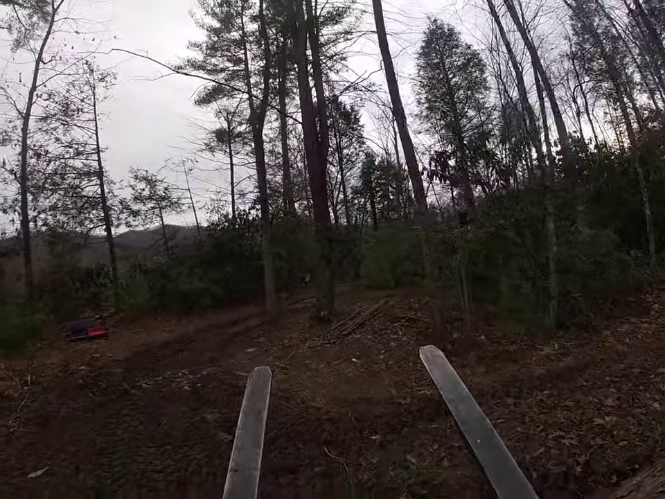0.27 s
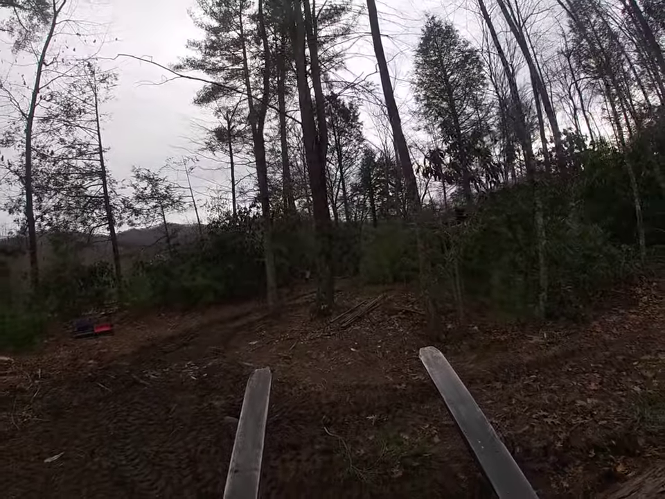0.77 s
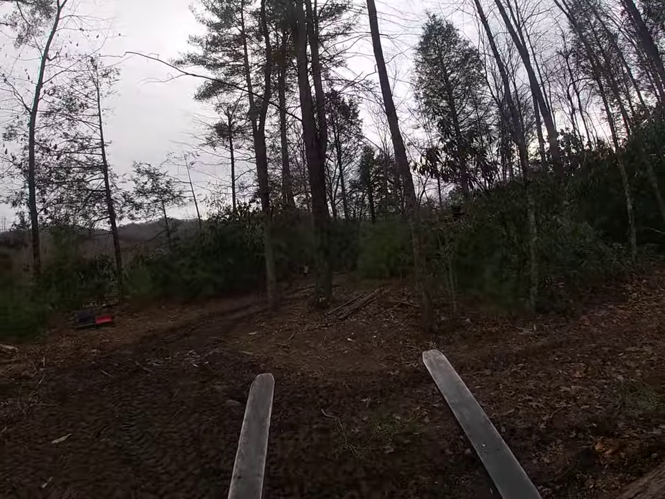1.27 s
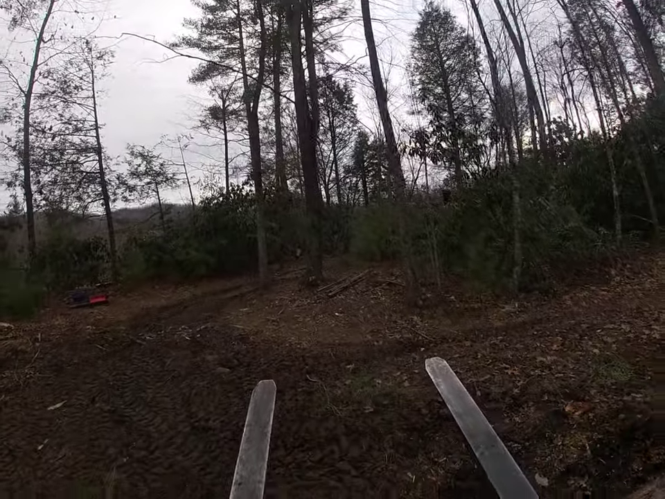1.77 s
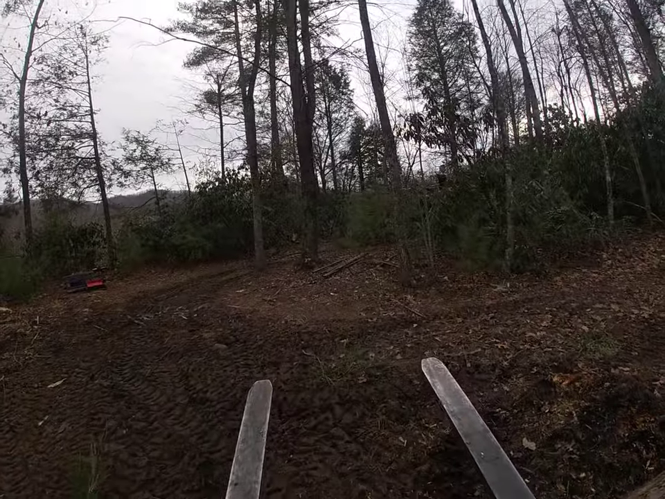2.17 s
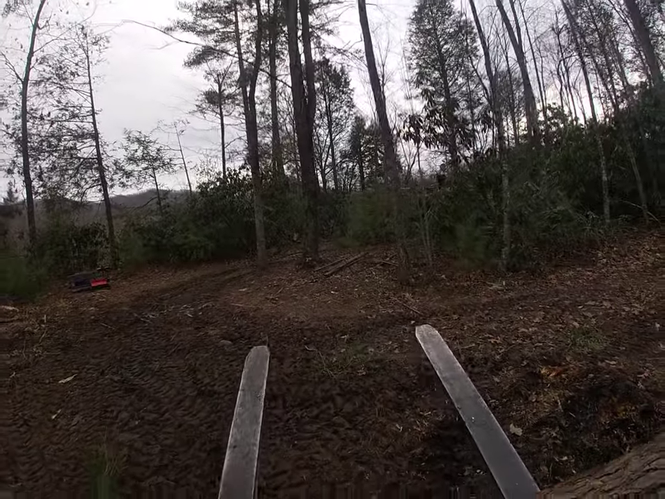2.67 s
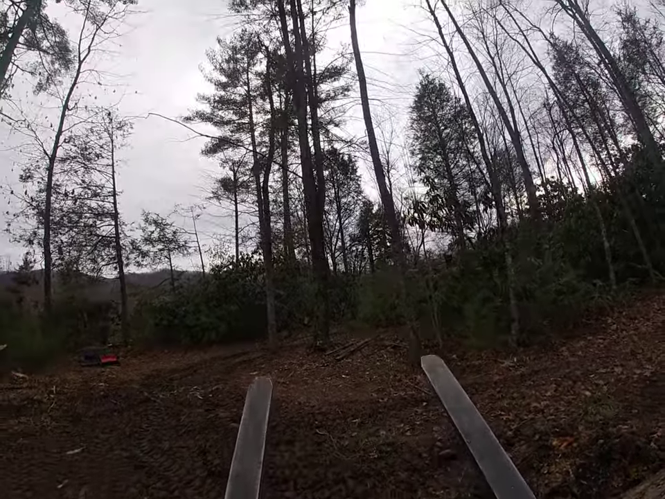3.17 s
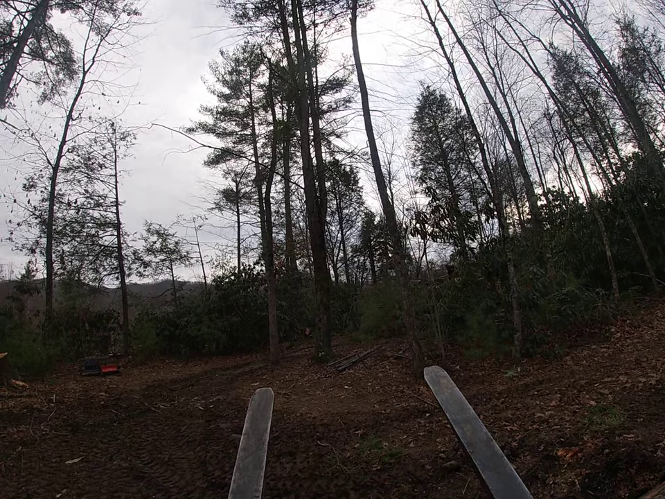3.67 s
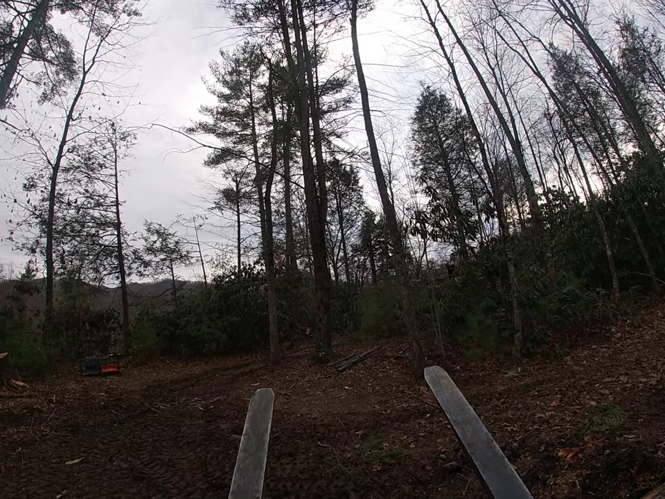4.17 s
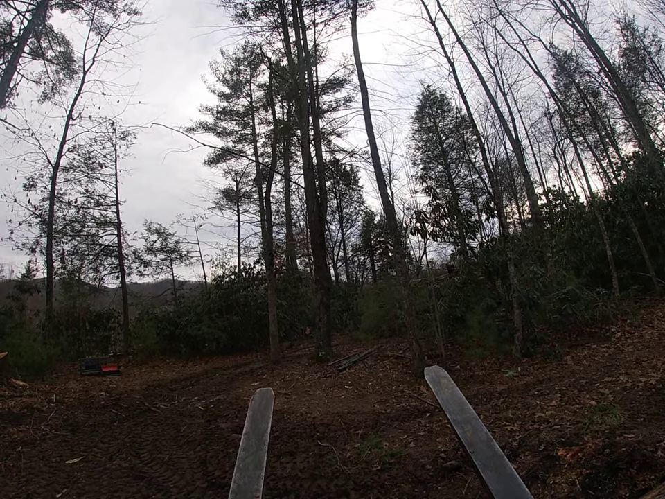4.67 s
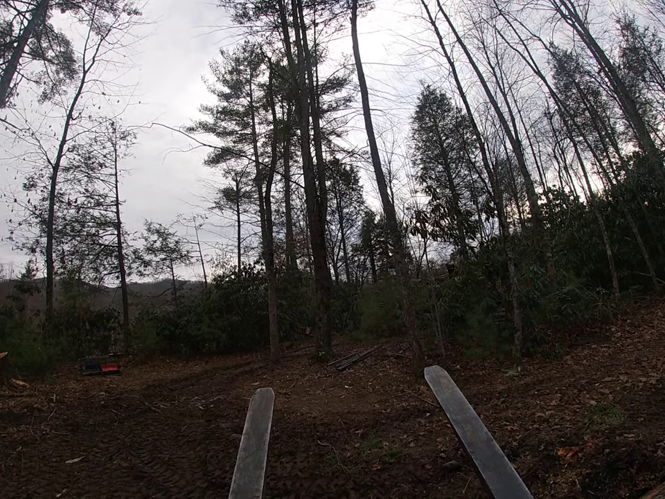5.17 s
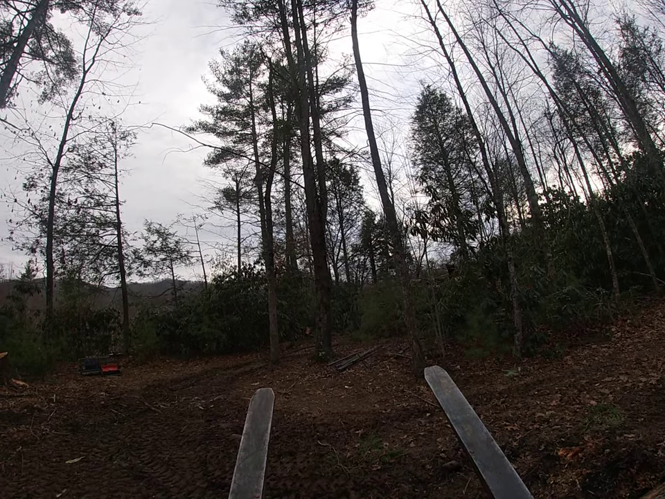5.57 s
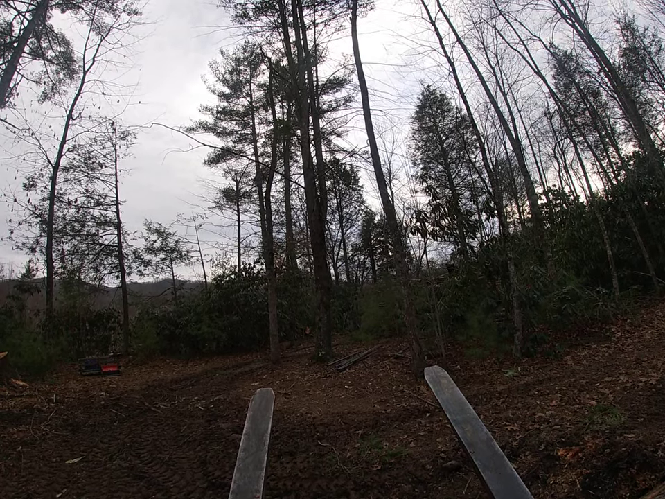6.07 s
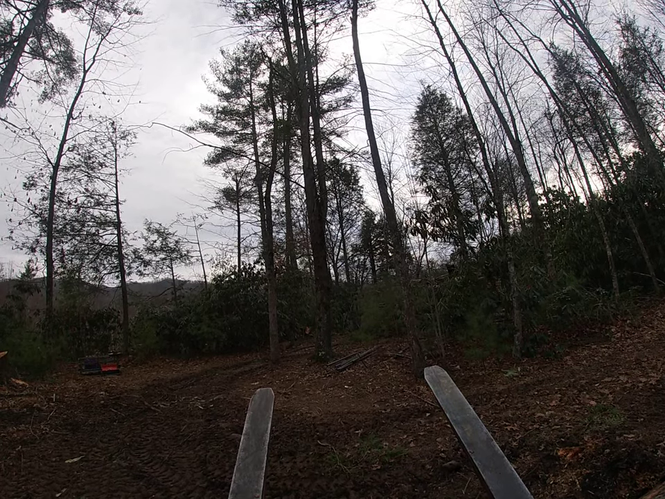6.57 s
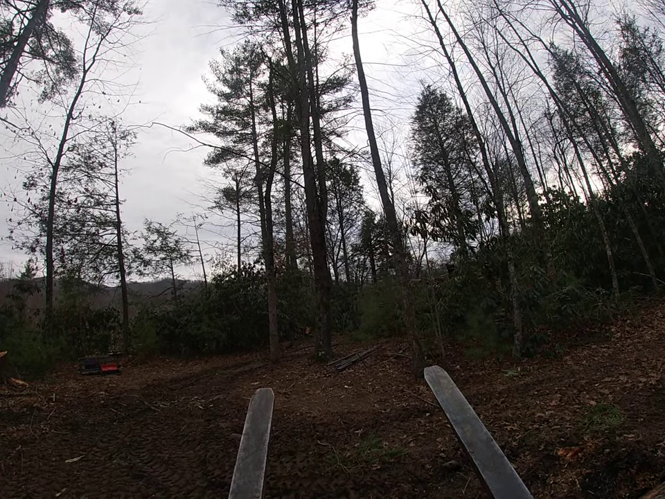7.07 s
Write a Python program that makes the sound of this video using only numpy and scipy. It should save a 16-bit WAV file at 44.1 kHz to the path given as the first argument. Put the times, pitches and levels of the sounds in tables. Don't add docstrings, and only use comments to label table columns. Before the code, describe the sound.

A small three-cylinder diesel tractor heard close from the operator's side in open woodland. It drones at steady working speed with dense valve clatter, gear whine and changing hydraulic whine. Around three seconds a loader clunks hard and a loose pin jingles. The engine holds on, then near five and a half seconds the throttle closes and the pitch slides quickly down to a rough, ticking idle with a loose plate rattling.

```python
import sys
import numpy as np
from scipy import signal
from scipy.fft import rfft, irfft, next_fast_len
from scipy.io import wavfile

SR = 44100
rng = np.random.default_rng(int(sys.argv[2]) if len(sys.argv) > 2 else 0)


def amplitude_ratio(level_db):
    exponent = np.asarray(level_db, float) / 20
    return 10 ** exponent


def waveform_to_disk(signal):
    frames = np.transpose(np.atleast_2d(signal))
    scaled = np.clip(frames, -1, 1) * 32767
    samples = np.round(scaled).astype(np.int16)
    wavfile.write(sys.argv[1], SR, samples)


N = 323253
TIME_S = np.arange(N) / SR


def rms_one(x):
    return x / np.sqrt(np.mean(x ** 2) + 1e-20)


def in_time(rows):
    s, value = np.transpose(rows)
    return np.interp(TIME_S, s, value)


def drift(rate_hz):
    r = np.exp(-80 * np.pi * rate_hz / SR)
    slow = signal.lfilter([1], [1, -2 * r, r * r], rng.standard_normal(N // 40 + 2002))[2000:]
    return np.interp(np.arange(N) / 40, np.arange(len(slow)), rms_one(slow))


def resonator(hz, width_hz):
    r = np.exp(-np.pi * width_hz / SR)
    return [1, -2 * r * np.cos(2 * np.pi * hz / SR), r * r], r


def resonances(x, modes):
    out = 0
    for k, (hz, width_hz, db) in enumerate(modes):
        poles, r = resonator(hz, width_hz)
        ring = signal.lfilter([1, 0, -1], poles, x)
        out = out + (-1) ** k * amplitude_ratio(db) * (1 - r * r) / 2 * ring
    return out


def coloured(x, spectrum):
    hz, db = np.transpose(spectrum)
    size = next_fast_len(N)
    log_hz = np.log(np.fft.rfftfreq(size, 1 / SR) + 1)
    gain = amplitude_ratio(np.interp(log_hz, np.log(hz), db))
    return rms_one(irfft(rfft(x, size) * gain, size)[:N])


def band(x, low_hz, high_hz):
    return signal.sosfilt(signal.butter(2, [low_hz, high_hz], "band", fs=SR, output="sos"), x)


def low_pass(x, hz):
    return signal.sosfilt(signal.butter(4, hz, fs=SR, output="sos"), x)


def bursts(events, t60s, rise_s):
    out = np.zeros(N)
    for (s, db, *_), t60 in zip(events, t60s):
        span = slice(int(s * SR), min(N, int((s + 2 * t60) * SR)))
        age = np.arange(span.stop - span.start) / SR
        out[span] += amplitude_ratio(db - 60 * age / t60) * (1 - np.exp(-age / rise_s))
    return out * rng.standard_normal(N) + 1e-18


def at_crank(firings, sizes, per_firing):
    step = np.floor(firings * per_firing).astype(int)
    click = np.append(0, np.diff(step) > 0)
    return click * np.asarray(sizes)[step % len(sizes)] / np.sqrt(np.gradient(firings))


def tones(firings, orders, levels_db, flutter_db, spread=0):
    out = np.zeros(N)
    for k, db in zip(orders, levels_db):
        phase = 2 * np.pi * k * firings - spread * k * (k - 1)
        out += np.sqrt(2) * amplitude_ratio(db + flutter_db * drift(18)) * np.sin(phase)
    return out


SHUT_S, COASTING_S, COASTED_S, CATCH_S, SETTLED_S = 5.54, 5.64, 5.97, 6.08, 6.4


def by_state(work_db, shut_db, recovery_db):
    working = np.interp(TIME_S, [SHUT_S, COASTING_S], [1, 0])
    off_db = np.interp(TIME_S, [COASTING_S, COASTED_S, CATCH_S, SETTLED_S], shut_db)
    recovered = np.interp(TIME_S, [CATCH_S, SETTLED_S], [0, 1])
    return working * work_db + (1 - working) * off_db + recovered * recovery_db


def valve_ticks(seatings, per_s, slowed):
    decay_s, tick_db, between_db = .014, 3, -5
    strength = amplitude_ratio(tick_db + 1.8 * rng.standard_normal(400))[seatings.astype(int)]
    tick = strength * np.exp(-(seatings % 1) / per_s / decay_s)
    return 1 - slowed + slowed * (amplitude_ratio(between_db) + tick)


def contacts(firings, throb, repeat, sharp, lag):
    per_firing = 200
    looped = rms_one(at_crank(firings, rng.standard_normal(3 * per_firing), per_firing))
    shake = np.sqrt(repeat) * looped + np.sqrt(1 - repeat) * rng.standard_normal(N)
    swell = np.exp(sharp * np.cos(2 * np.pi * (firings - lag)))
    throb = np.clip(throb, 0, 1)
    return shake * (1 - throb + throb * rms_one(swell))


def oil_hiss(travel_db):
    hiss = band(band(rng.standard_normal(N), 12000, 14200), 12000, 14200)
    return amplitude_ratio(-81 + .5 * travel_db) * rms_one(hiss)


# start in seconds, peak in dB.
TWIG_TICKS = [
    (0.7986, -53),
    (1.3594, -46.5),
    (2.1833, -51),
    (4.4425, -48),
]


def twigs():
    return low_pass(band(bursts(TWIG_TICKS, [.12] * 4, rise_s=0.0043), 6000, 11000), 13000)


# start in seconds, peak in dB, upper mode in dB, pitch factor, t60 in seconds.
PIN_TOUCHES = [
    (2.888, -36, -30, 1.0, .05),
    (3.111, -25, -25, .975, .05),
    (3.120, -23, -20, 1.004, .07),
    (3.146, -21, -23, 1.0, .04),
    (3.162, -34, -14, 1.012, .05),
    (3.191, -35, -22, .996, .05),
]
PIN_MODES_HZ = (5150, 8880)


def pin():
    out = np.zeros(N)
    for s, db, upper_db, pitch, t60 in PIN_TOUCHES:
        span = slice(int(s * SR), int((s + .12) * SR))
        age = TIME_S[span] - TIME_S[span][0]
        lower, upper = [np.sin(2 * np.pi * hz * pitch * age) for hz in PIN_MODES_HZ]
        out[span] += amplitude_ratio(db - 60 * age / t60) * (lower + amplitude_ratio(upper_db) * upper) * (1 - np.exp(-age / .0008))
    return out


# start in seconds, peak in dB, t60 in seconds.
LOADER_BANGS = [
    (3.0127, -21.5, 0.058),
    (3.032, -16, 0.058),
    (3.0417, -18.5, 0.17),
]


def loader():
    bang = bursts(LOADER_BANGS, np.array(LOADER_BANGS)[:, 2], rise_s=0.00073)
    thud = amplitude_ratio(22) * band(bang, 170, 320)
    clank = amplitude_ratio(7) * band(bang, 880, 2080) + amplitude_ratio(-3) * band(bang, 1700, 4300)
    edge = amplitude_ratio(-31) * low_pass(band(bang, 9000, 9500), 10000)
    return low_pass(thud + clank, 7200) + edge


# Hz, width in Hz, level in dB.
SHROUD_MODES = [(394, 46, 0)]


def fan_shroud(travel_db):
    return amplitude_ratio(-34 + .83 * travel_db) * rms_one(resonances(rng.standard_normal(N), SHROUD_MODES))


# start in seconds, end in seconds, pump second in dB, pump third in dB.
VALVE_WHINES = [
    (0, .3, -35, -42),
    (1.68, 2.07, -41.5, -49),
    (2.45, 2.73, -29.5, -31),
    (2.74, 3.11, -40, -36),
    (3.7, 5.55, -36, -60),
]


def whine(rest_db, column):
    edge_s = 0.027
    level_db = rest_db + np.zeros(N)
    for row in VALVE_WHINES:
        held = np.clip(np.minimum(TIME_S - row[0], row[1] - TIME_S) / edge_s + .5, 0, 1)
        level_db = np.maximum(level_db, rest_db + held * (row[column] - rest_db))
    return level_db


DRIVEN = (4.58, 9.16, 6.295, 12.59, 18.885, 22.667)
# time in seconds, level in dB.
PUMP_PRESSURE = [(0, -46), (.25, -39), (.5, -33), (.75, -23), (1.1, -31), (1.499, -22), (2.0, -25),
                 (2.25, -25.5), (2.52, -47), (2.64, -16.5), (2.78, -18), (2.9, -30), (3.02, -22),
                 (3.25, -57.5), (5.5, -52), (6.2, -58), (7.0, -45), (7.25, -37)]


def driven_parts(firings, fan_db, travel_db):
    gear_db = -34 + travel_db
    levels_db = [fan_db, -32.5 + .83 * travel_db, in_time(PUMP_PRESSURE), whine(-50, column=2),
                 whine(-45 + .64 * travel_db, column=3), gear_db]
    out = tones(firings + .003 * drift(14), DRIVEN, levels_db, flutter_db=1.7)
    return out + tones(firings, [25.18], [gear_db - 14], flutter_db=2.5)


# tones per firing, level in dB against the fifth
GEAR_TONES = [(10, -9), (20.333, -17), (21, -18), (28.71, -18), (33, -26), (42, -26), (56, -26),
              (39, -27), (44.333, -30), (54, -32), (64, -33), (69, -31), (76, -37), (94.333, -37)]


def gears(firings, fifth_db, idling):
    partials = GEAR_TONES
    levels_db = [fifth_db + db - 15 * idling for _, db in partials]
    return tones(firings, [k for k, _ in partials], levels_db, flutter_db=2.5)


# Hz, width in Hz, level in dB.
TAPPET_MODES = [(2250, 50, 0)]


def rattles(seatings, recovery_db):
    from_s, lag_firings, jitter_s, chance = 6.3, .05, .009, .85
    s = np.flatnonzero(np.diff(np.floor(seatings - lag_firings))) / SR
    s = s[s > from_s]
    s = s[rng.random(len(s)) < chance]
    start_s = s + jitter_s * rng.standard_normal(len(s))
    peak_db = -34 + 2 * rng.standard_normal(len(s))
    chatter = bursts(list(zip(start_s, peak_db)), [.05] * len(s), rise_s=0.0013)
    return amplitude_ratio(27.5 + recovery_db) * resonances(chatter, TAPPET_MODES)


TAPPET_STRENGTH_DB = (0, 1, -5)


def tappets(firings, uneven_db):
    strength = amplitude_ratio(uneven_db * rng.standard_normal(400))[firings.astype(int)]
    blows = at_crank(firings - .15, amplitude_ratio(TAPPET_STRENGTH_DB), per_firing=1)
    blows += at_crank(firings - .4, amplitude_ratio(TAPPET_STRENGTH_DB), per_firing=1)
    return rms_one(resonances(blows * strength + 1e-18, TAPPET_MODES))


# Hz, width in Hz, level in dB.
BELT_MODES = [(6858, 12, 0)]


def idle_top(seatings, per_s, clatter_db, idling, high):
    injectors = band(rng.standard_normal(N), 2500, 5800) * amplitude_ratio(1.3 * drift(25))
    strokes = valve_ticks(seatings + .55, .4 * per_s, slowed=.95)
    ticking = rms_one(low_pass(strokes * injectors, 5000))
    whistle = rms_one(resonances(injectors + high, BELT_MODES))
    return idling * amplitude_ratio(clatter_db - 10.5) * ticking + idling ** 4 * amplitude_ratio(clatter_db - 41) * whistle


# Hz, width in Hz, level in dB.
FRAME_MODES = [(271, 72.2, -1.5), (184, 84, -11.5), (276, 34.5, -8.5), (77.4, 79.4, -8.5)]
BLOCK_MODES = [(474.6, 103, 7), (617, 48, 1.5), (697, 210, -16.5), (852, 98, -1), (942, 77, -2)]
SIDE_PANEL_MODES = [(1320, 55, 0)]
BONNET_MODES = [(1527, 24, 0)]
# level in dB at work, as overrun begins, as it ends, as the governor catches, at idle.
BODY_LEVELS = [(-36, -38, -41.5, -43.5, -38.5), (-47.5, -43.5, -50, -49, -47),
               (-44.5, -49, -53, -45, -41.5), (-48, -70, -69, -73, -47), (-43.5, -46, -46.5, -51.5, -37.5)]


def engine_body(firings, travel_db, idling, recovery_db, high):
    frame_db, block_db, panel_db, tappet_db, bonnet_db = [
        by_state(row[0], row[1:], recovery_db) + 1.6 * drift(1.3) for row in BODY_LEVELS]
    block_db = block_db - by_state(.45 * travel_db, np.zeros(4), 0)
    low = contacts(firings, .1 + .1 * idling, repeat=.4, sharp=1.2, lag=.2)
    out = amplitude_ratio(frame_db + 11) * rms_one(resonances(low, FRAME_MODES))
    out += amplitude_ratio(block_db + 8.5) * rms_one(resonances(low, BLOCK_MODES))
    out += amplitude_ratio(panel_db) * rms_one(resonances(high, SIDE_PANEL_MODES))
    out += amplitude_ratio(bonnet_db) * rms_one(resonances(high, BONNET_MODES))
    return out + amplitude_ratio(tappet_db) * tappets(firings, uneven_db=1.8)


# Hz, level in dB per Hz.
CLATTER_SPECTRUM = [(500, -7.5), (900, -1), (1150, -8), (1700, -3), (2100, -9), (3100, -12.5),
                    (4600, -20.5), (5700, -22.5), (6700, -47), (8000, -41), (9200, -37), (10800, -44),
                    (11600, -52), (14500, -65)]
# Hz, width in Hz, level in dB.
PANEL_MODES = [(1950, 45, -16), (2606, 20, -15), (2940, 70, -18), (3210, 30, -22), (4070, 45, -25),
               (5150, 120, -24), (6850, 30, -30)]
VALVE_TOP_DB = (0.9, 2, 4, 2.5, -3.5)


def valve_clatter(seatings, per_s, clatter_db, high):
    clatter = coloured(high, CLATTER_SPECTRUM) + amplitude_ratio(13) * low_pass(resonances(high, PANEL_MODES), 5400)
    dull = signal.sosfiltfilt(signal.butter(4, 7000, fs=SR, output="sos"), clatter)
    ticks = valve_ticks(seatings, per_s, slowed=by_state(0, np.ones(4), 0))
    top = amplitude_ratio(by_state(VALVE_TOP_DB[0], VALVE_TOP_DB[1:], 0)) * ticks * (clatter - dull)
    return amplitude_ratio(clatter_db) * rms_one(dull + top)


FIRING_DB = (0.0, -1.5, -0.7)
# Hz, width in Hz, level in dB.
MUFFLER_MODES = [(253, 18, 0), (281, 22, -3), (470, 40, -12)]
KNOCK_DB = (0.3, 0.3, -1.5, -11, -1)


def knocks(firings, clatter_db, idling, recovery_db):
    pulses = at_crank(firings, amplitude_ratio(FIRING_DB), per_firing=1) * amplitude_ratio(.5 * drift(30))
    ring = rms_one(band(resonances(pulses + 1e-18, MUFFLER_MODES), 215, 320))
    state_db = by_state(KNOCK_DB[0], KNOCK_DB[1:], .5 * recovery_db)
    return amplitude_ratio(clatter_db - 13 + 15 * idling + state_db) * ring


WORK_FIRINGS_PER_S = (43.4, 44.5, 45.6, 46.5)
WORK_LEVELS = [(-24, -19, -18, -16), (-22, -23, -23.5, -24.5), (-28.5, -25, -28, -27),
               (-27.5, -33.5, -37.5, -67), (-20, -66.5, -43.5, -33), (-34, -44, -37, -29),
               (-30, -25.5, -28, -23.5)]
# level in dB as overrun begins, as it ends, as the governor catches, at idle.
SHUT_LEVELS = [(-14.5, -21, -23.5, -30.5), (-46.5, -31, -27.5, -34), (-32, -31, -40, -32.5),
               (-41, -37, -36.5, -42), (-59, -51, -55, -31.5), (-39, -35.5, -51, -36.5),
               (-29, -54, -58, -62)]


def order_levels(per_s, recovery_db):
    return [by_state(np.interp(per_s, WORK_FIRINGS_PER_S, work), shut, recovery_db)
            for work, shut in zip(WORK_LEVELS, SHUT_LEVELS)]


def exhaust(firings, exhaust_db, idling):
    poles, _ = resonator(hz=232, width_hz=60)
    orders = tones(firings, range(1, 7), exhaust_db, flutter_db=.35, spread=.45 * idling - .15)
    return signal.lfilter(poles[::-1], poles, orders)


# time in seconds, firings per second.
ENGINE_SPEED = [(0, 45.95), (.55, 45.7), (1.0, 44.45), (1.5, 44.3), (1.75, 44.6), (2.15, 44.7),
                (2.52, 45.7), (2.7, 45.2), (3.02, 43.3), (3.25, 43.8), (3.55, 46.5), (4.5, 46.55),
                (5.52, 46.4), (6.1, 29.5), (6.3, 25.3), (6.45, 24.2), (6.8, 25.1), (7.33, 25.5)]
# time in seconds, level in dB.
CLATTER_LEVEL = [(0, -32.5), (.65, -34.5), (1.0, -32.5), (1.9, -33.5), (2.5, -34.5), (3.1, -33), (3.6, -33),
                 (4.1, -38), (5.15, -36.5), (5.42, -36.5), (5.9, -42.5), (6.2, -41.5), (6.7, -36.5),
                 (7.33, -33)]
# time in seconds, dB against full load.
TRAVEL_LOAD = [(0, -8.5), (.72, 1.5), (2.35, -0.5), (2.9, -6), (3.45, -12.5), (3.7, -15), (5.5, -14.5),
               (6.0, -41), (7.33, -14)]


def scene():
    per_s, clatter_db, travel_db = in_time(ENGINE_SPEED), in_time(CLATTER_LEVEL), in_time(TRAVEL_LOAD)
    recovery_db = clatter_db + 33.5
    idling = np.interp(per_s, [25, 42], [1, 0])
    firings = .47 + np.cumsum(per_s) / SR
    valve_seats_s = 7.0565
    seatings = firings + 1 - firings[int(valve_seats_s * SR)] % 1
    *exhaust_db, fan_db = order_levels(per_s, recovery_db)
    high = contacts(firings, .06 + .2 * idling, repeat=.55, sharp=1.1, lag=.1 + firings - seatings)
    high = high * amplitude_ratio(.9 * drift(16))

    out = oil_hiss(travel_db) + twigs() + pin() + loader()
    out += driven_parts(firings, fan_db, travel_db)
    out += gears(firings, exhaust_db[4], idling)
    out += idle_top(seatings, per_s, clatter_db, idling, high)
    body = fan_shroud(travel_db) + rattles(seatings, .5 * recovery_db)
    body += engine_body(firings, travel_db, idling, recovery_db, high)
    body += knocks(firings, clatter_db, idling, recovery_db)
    out += low_pass(body, 5770)
    out += valve_clatter(seatings, per_s, clatter_db, high)
    out += exhaust(firings, exhaust_db, idling)
    return out[None]


def top_cut(x):
    return signal.sosfilt(signal.butter(12, 14900, fs=SR, output="sos"), x)


def record(dry):
    soft = 0.79 * np.tanh(dry / 0.77)
    return top_cut(soft)


dry = scene()
out = record(dry)
waveform_to_disk(out)
```